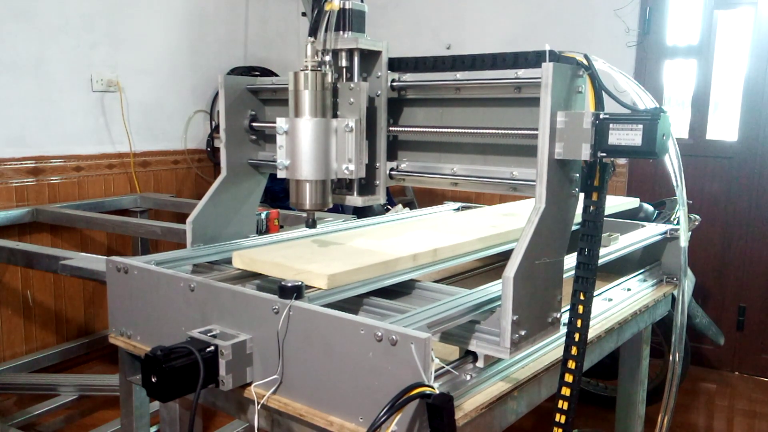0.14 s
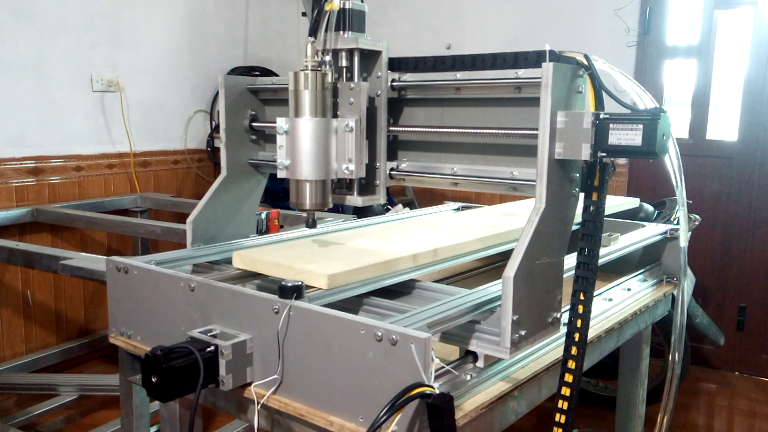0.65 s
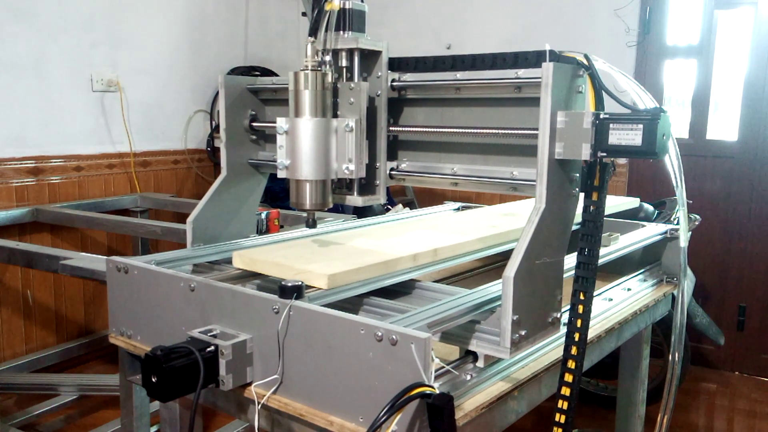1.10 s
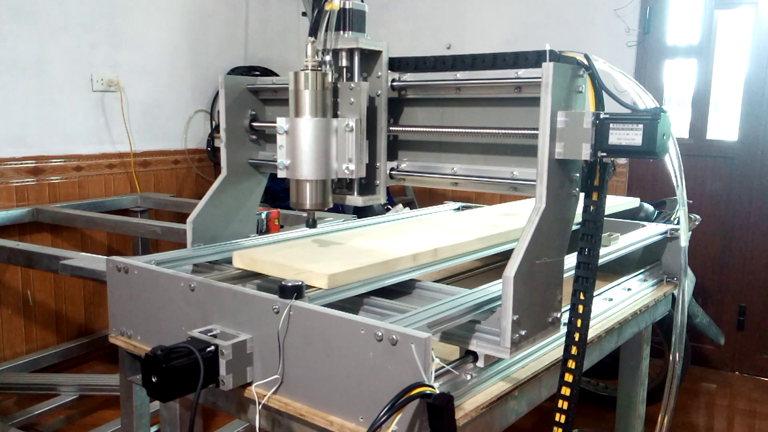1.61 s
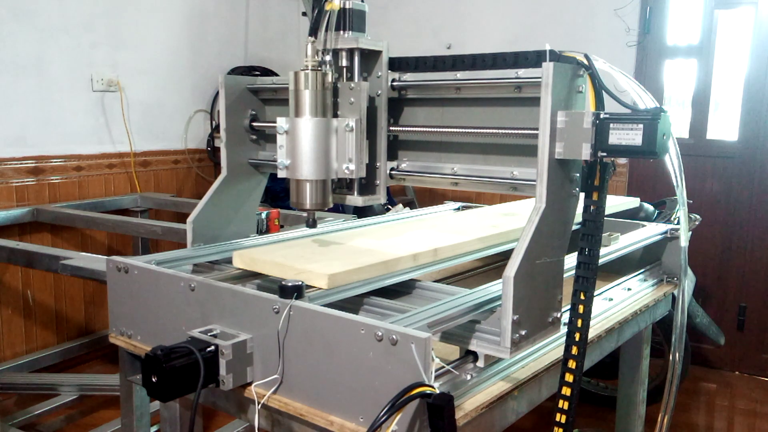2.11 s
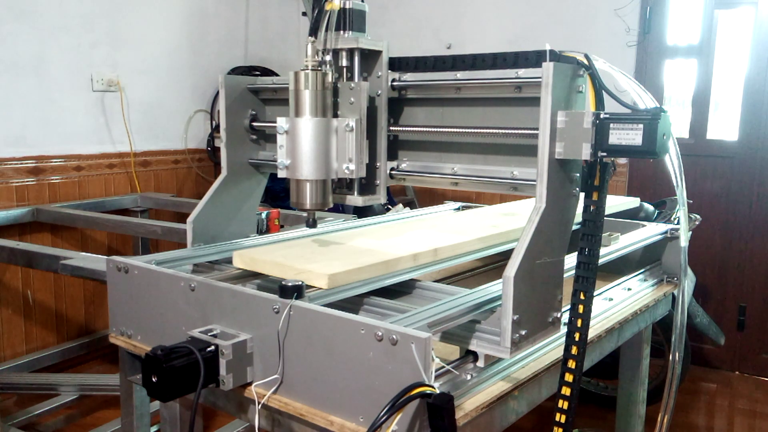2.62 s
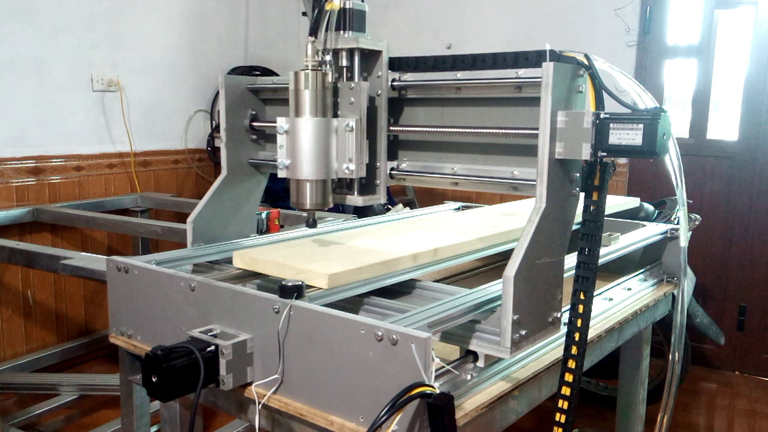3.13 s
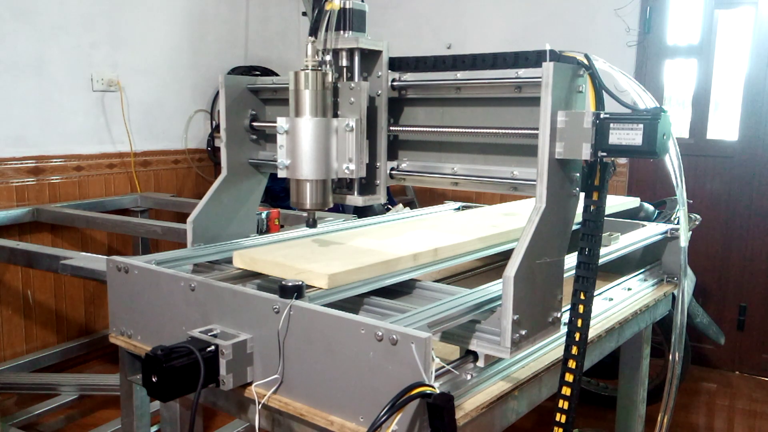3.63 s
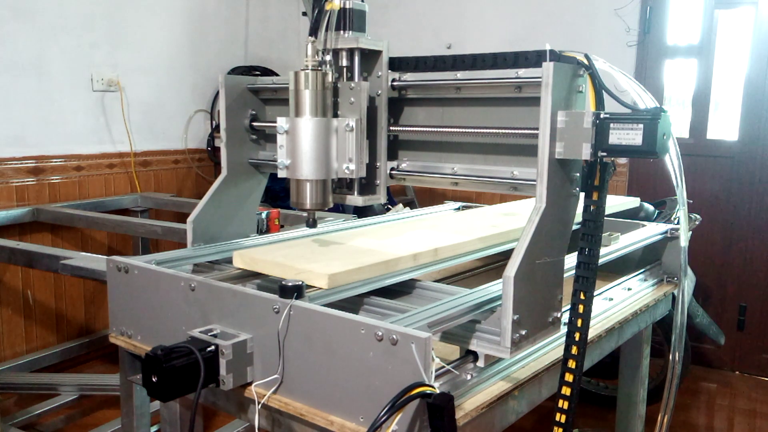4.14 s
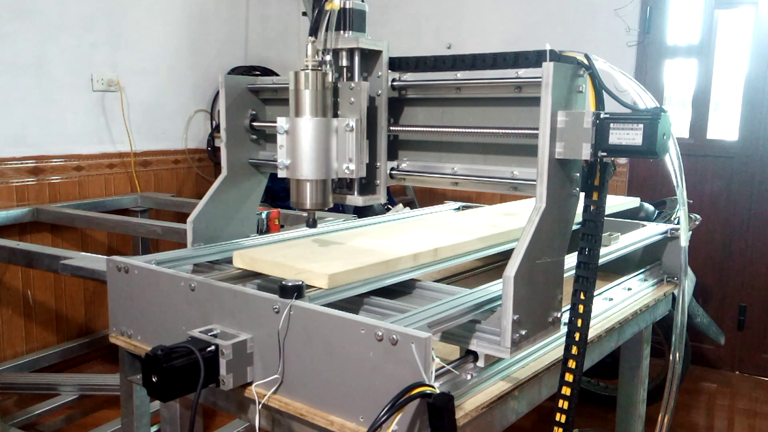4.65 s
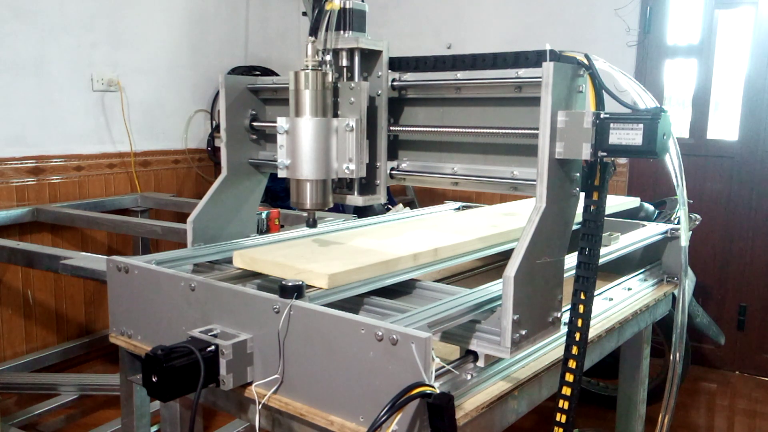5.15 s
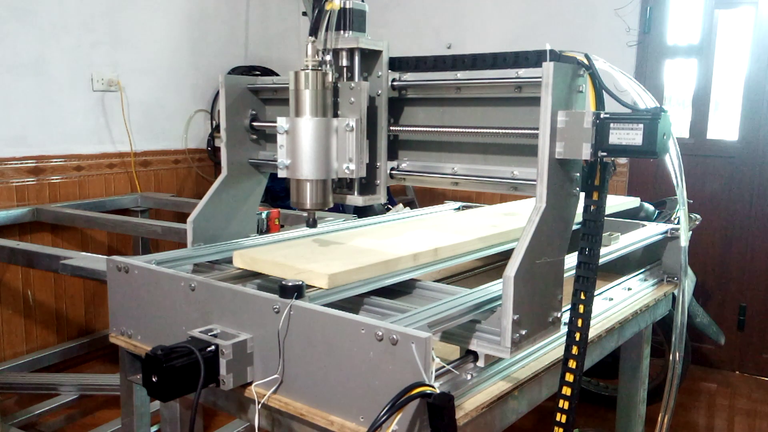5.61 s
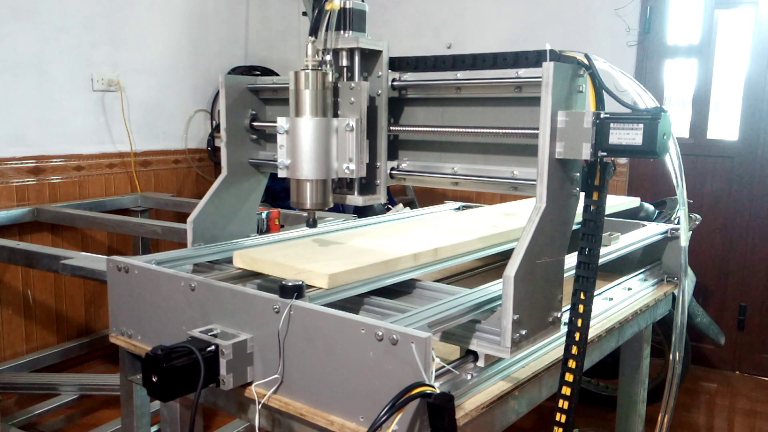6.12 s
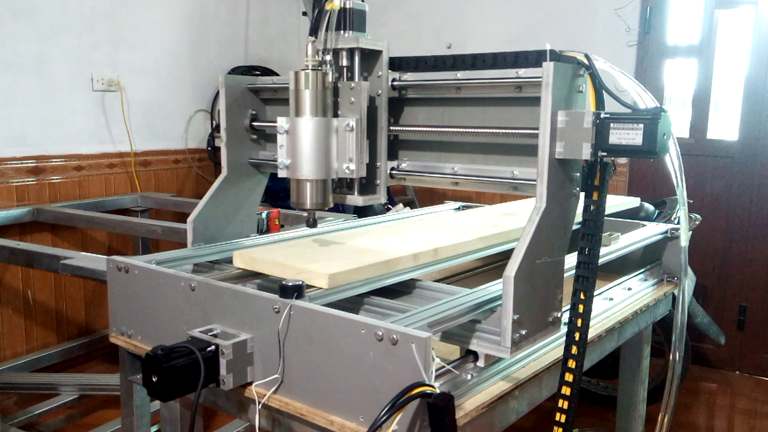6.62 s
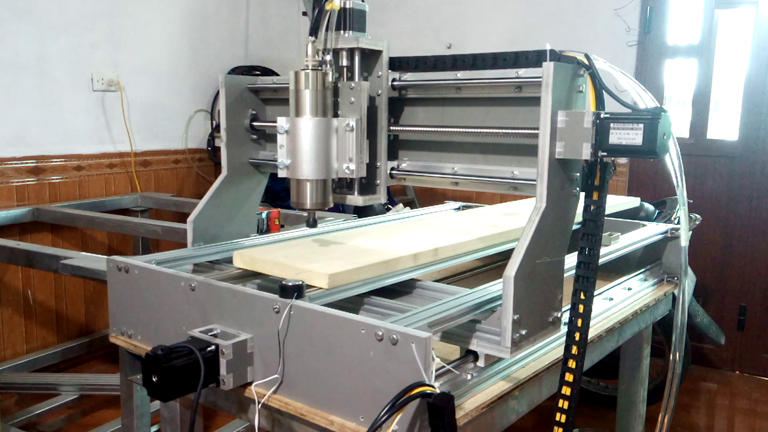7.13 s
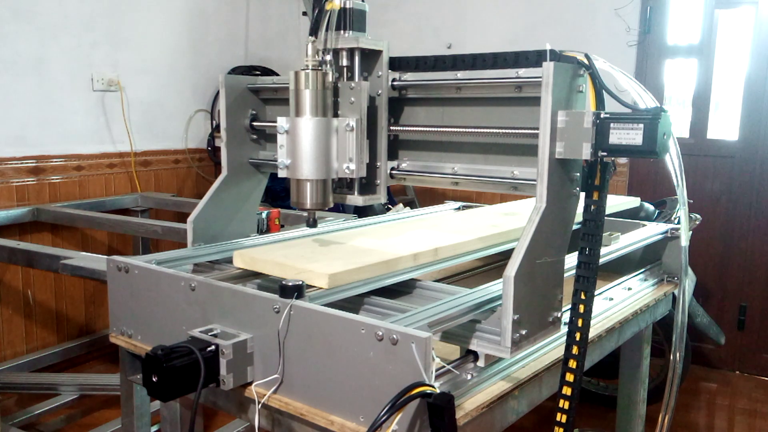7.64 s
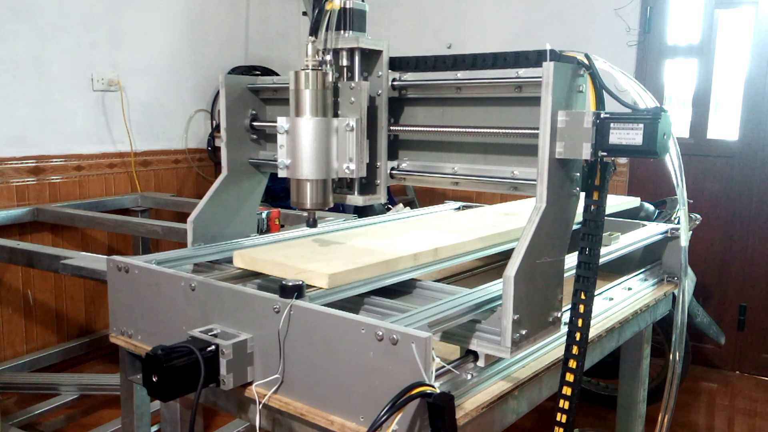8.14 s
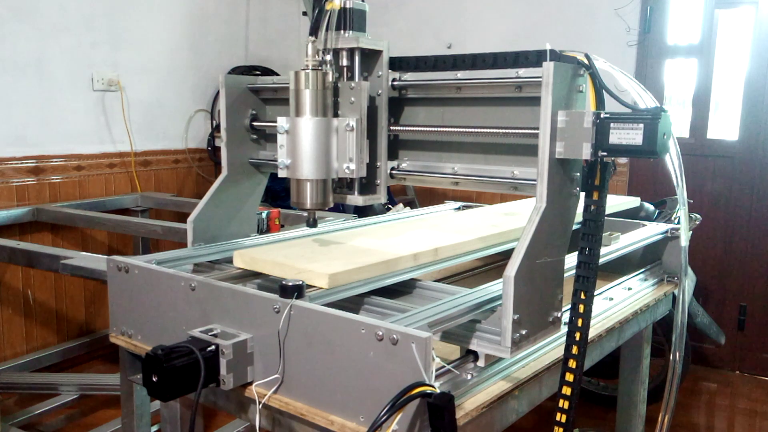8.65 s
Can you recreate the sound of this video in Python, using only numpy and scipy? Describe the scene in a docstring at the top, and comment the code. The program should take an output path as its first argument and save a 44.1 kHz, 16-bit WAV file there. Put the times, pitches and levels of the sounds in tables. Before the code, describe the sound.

Steady, shrill whine of a spindle motor in a tiled workshop, with quiet airy whir, an early sharp tick, and soft low thuds later on.

```python
"""A tiled workshop, where a water-cooled router spindle idles at a steady speed. Its inverter sings switching tones
with sidebands at multiples of the drive frequency; shaft, bearings, pump and electronics add held sines, and
filtered noise makes the rushing air. Soft low thumps are swelling, decaying rings; two ticks and faint treble
rustles are enveloped bands of noise. At the end a feed motor starts to hum, a sine sagging in pitch."""
import sys
import numpy as np
from scipy import signal
from scipy.fft import rfft, irfft, next_fast_len
from scipy.io import wavfile
from scipy.ndimage import uniform_filter1d, map_coordinates

SR = 44100
rng = np.random.default_rng(int(sys.argv[2]) if len(sys.argv) > 2 else 0)


def ratio_of_db(decibels):
    """Turn decibels (scalar or array-like) into linear amplitude factors; 0 dB maps to 1."""
    return 10 ** (np.asarray(decibels, float) / 20)


def dump(signal):
    """Clip the signal to [-1, 1] and save it as 16-bit WAV at the path in sys.argv[1]."""
    limited = np.clip(np.atleast_2d(signal).T, -1, 1)
    pcm = np.round(limited * 32767).astype(np.int16)
    wavfile.write(sys.argv[1], SR, pcm)


N = 386316
T = np.arange(N) / SR  # time in s

# Relative spectrum of the floor rumble: f/Hz, spectral level/dB
RUMBLE_SPECTRUM = [(22, -36.5), (38, -8.5), (65, -6.5), (91, 0), (118, -1.5), (188, -5), (227, -11),
                   (260, -8), (340, -34.5), (570, -120)]


def unit(x):
    """Normalisation: x scaled to an rms of 1."""
    return x / np.sqrt(np.mean(x ** 2) + 1e-20)


def curves(rows):
    """Linear interpolation: one value per sample for each column after the time."""
    s, *columns = np.transpose(rows)
    return [np.interp(T, s, column) for column in columns]


def wobble(rate):
    """Random modulation: Gaussian knots, rate of them a second, joined by straight lines."""
    knots = rng.standard_normal(int(N * rate / SR) + 4)
    return map_coordinates(knots, [T * rate], order=1)


def noise(gain):
    """Spectral shaping: white noise weighted by gain(Hz), brought to rms 1."""
    m = next_fast_len(N)
    spectrum = rfft(rng.standard_normal(m)) * gain(np.fft.rfftfreq(m, 1 / SR))
    return unit(irfft(spectrum, m)[:N])


def shape(points):
    """Frequency response: gain through (Hz, dB) points on a log axis, closed at both ends."""
    hz, db = np.transpose(points)
    return lambda f: ratio_of_db(np.interp(np.log(f + 1), np.log(hz + 1), db, -120, -120))


def tone(hz, db, drift=0, waver_db=1.5):
    """Sine by phase integration: drift offsets its pitch in Hz at each sample; its rms level db wavers."""
    phase = 2 * np.pi * (hz * T + np.cumsum(drift + 0 * T) / SR + rng.random())
    return np.sqrt(2) * ratio_of_db(db + waver_db * wobble(2.51)) * np.sin(phase)


def patchy(x, depth_db, bins, frames):
    """Time-frequency modulation: random lulls and weaker swells, shallowest in the mid range."""
    hz, _, z = signal.stft(x, SR, nperseg=512)
    grain = uniform_filter1d(rng.standard_normal(z.shape), bins, 0)
    field = unit(uniform_filter1d(grain, frames, 1))
    field = np.where(field > 0, .3 * field, field)  # lulls go deeper than swells rise
    depth = depth_db * np.interp(hz, [0, 1200, 2800], [.9, .5, 1.3])[:, None]
    return unit(signal.istft(z * ratio_of_db(depth * field), nperseg=512)[1][:N])


def inverter():
    """Switching modulation: sidebands at multiples of the drive frequency share one slight clock drift."""
    # Switching tones: centre f/Hz, sideband orders (multiples of the drive frequency). The fourth row is no
    # switching tone: it only places two faint high whistles near 11815 and 12479 Hz
    carriers = [(4641.3, (-4, -3, -2, 0, 2, 3, 4)), (7173.5, (-5, -4, -3, -2, -1, 0, 1, 2)),
                (10701.8, (-5, -3, -1, 5)), (12146.7, (-1, 1)), (13682.8, (-5, -3, -1, 0, 1, 2, 3, 4, 5))]
    # Mean rms level of each of those tones: one row per row above, level/dB in the order of its orders
    sideband_db = [(-86, -77, -68, -69, -76, -62, -89), (-93, -82, -90, -92, -68, -89, -77, -96),
                   (-93, -96, -102, -97), (-103, -86), (-92, -100, -89, -102, -81, -102, -82, -99, -80)]
    # Slow level course of three further sidebands: t/s, first order below the first centre level/dB,
    # first order above it level/dB, first order above the third centre level/dB
    whine = [(0, -33.5, -48.2, -75.5), (0.35, -32.5, -46, -75.2), (0.8, -32.5, -47.5, -76.5),
             (1.3, -31.8, -48.3, -76), (2.0, -31, -49, -74.8), (2.55, -31.6, -48.5, -74),
             (3.1, -31.0, -48, -74.3), (3.5, -31, -48.7, -75), (4.2, -30.8, -47.6, -74.5),
             (5.35, -31, -46.9, -73.8), (5.5, -31, -45, -73.8), (5.8, -32.1, -45.3, -73),
             (6.2, -31, -47.0, -73.3), (6.85, -32, -47.0, -72), (7.6, -32.5, -47.3, -72.5),
             (8.3, -31.5, -47.5, -73.5), (8.76, -32.3, -46.7, -73)]
    drive_hz = 332.02
    dip_s, dip_db, dip_width_s = 5.485, 3.6, .065  # width to 1/e of the depth, either side
    drift_hz = .25 * wobble(1.5)

    lower_db, upper_db, high_db = curves(whine)
    # the loudest sideband dips briefly
    lower_db = lower_db - dip_db * np.exp(-((T - dip_s) / dip_width_s) ** 2)
    lower_db = lower_db + .2 * wobble(5) + .2 * wobble(9) + .12 * wobble(20)
    upper_db = upper_db + .4 * wobble(4) + .3 * wobble(20)
    high_db = high_db + .5 * wobble(8)

    first_hz, third_hz = carriers[0][0], carriers[2][0]
    out = tone(first_hz - drive_hz, lower_db, drift_hz, waver_db=0)
    out += tone(first_hz + drive_hz, upper_db, drift_hz, waver_db=0)
    out += tone(third_hz + drive_hz, high_db, drift_hz, waver_db=0)
    for (centre_hz, orders), levels in zip(carriers, sideband_db):
        for order, db in zip(orders, levels):
            out += tone(centre_hz + order * drive_hz, db, drift_hz, waver_db=0.7)
    return out


def spindle():
    """Periodic excitation by turning parts: held tones, each wandering in pitch in proportion to its width."""
    # Shaft, bearing and pump tones: f/Hz, mean rms level/dB, pitch wander/Hz
    held_tones = [(200.5, -82, 0.2), (300.1, -69, 0.3), (331.7, -55, 0.2), (653.4, -68, 1.0),
                  (735.5, -58, 0.2), (860.7, -73, 0.2), (1199.1, -73, 0.3), (1293.3, -70, 0.2),
                  (1445.4, -71, 0.2), (1992.5, -72, 0.2), (2116.3, -75, 0.2), (2398.9, -76, 0.2),
                  (2501.2, -74, 0.2), (2625.0, -77, 1.0), (3023.4, -77, 0.3), (3756.9, -79, 0.2),
                  (3900.2, -79, 0.2), (4050.3, -76, 0.2), (4079.9, -76, 0.2), (4216.5, -71, 0.4),
                  (4401.5, -65, 0.3), (4468.8, -76, 0.2), (4586.6, -74, 0.7), (4736.0, -77, 0.2),
                  (4868.5, -80, 0.2), (5391.4, -75, 0.3), (5508.5, -82, 0.2), (5524.6, -81, 0.3),
                  (5657.8, -78, 0.2), (5845.6, -82, 0.2)]
    # Tones of slowly changing level: f/Hz, pitch wander/Hz
    swelling = [(1312, 5), (1578.5, .2), (1711.7, .3), (2099, 3), (3813.1, .3), (4602.4, .5)]
    # One slow level arc for each of these: level at the turning point/dB, its t/s, loss either side/(dB/s^2)
    arcs = [(-66.5, 3, .05), (-62.5, 1.5, .25), (-70.5, 3, -.2), (-58.5, 4, -0.05), (-65, 3, 0.4),
            (-61, 4.2, 0.7)]
    out = np.zeros(N)
    for hz, db, width in held_tones:
        out += tone(hz, db, width * wobble(3), waver_db=.6)
    for (hz, width), (turning_db, s, bend) in zip(swelling, arcs):
        arc_db = turning_db - bend * (T - s) ** 2
        out += tone(hz, arc_db + .8 * wobble(14), width * wobble(4), waver_db=.8)
    return out


def electronics():
    """Narrow-band oscillation: faint high whistles that waver in pitch and level."""
    # Whistles: f/Hz, mean rms level/dB
    whistles = [(6447.3, -79), (6580.6, -87), (6965.5, -77), (6971.9, -78), (7145.2, -92), (7236.5, -85),
                (7295.1, -89), (7759.4, -90), (9240.2, -100), (9282.5, -92), (9337.8, -98), (9596.0, -99),
                (9893.5, -99), (10493.8, -100), (10783.1, -96), (10795.3, -84), (10916.2, -88),
                (11685.7, -99), (11994.7, -89), (12596.0, -98), (12894.5, -91), (12927.5, -93),
                (13060.8, -96), (13194.1, -92), (13613.0, -100), (13940.7, -100), (14527.1, -97)]
    return sum(tone(hz, db, 0.84 * wobble(3.3), waver_db=2.0) for hz, db in whistles)


def air():
    """Turbulence exciting resonators: rush through the housing modes, hiss above it, rumble below it."""
    # Relative spectrum of the air and bearing rush: f/Hz, spectral level/dB
    rush_spectrum = [(200, -22.5), (280, -9.5), (350, -5.5), (470, -14.5), (600, -6.5), (720, -0.5),
                     (900, -3), (1300, -4.5), (1800, -6), (2300, -8), (3000, -12), (3600, -11),
                     (4300, -5.5), (5000, -9.5), (5700, -12), (6500, -19.5), (7300, -22.5), (8000, -44)]
    # Relative spectrum of the treble hiss: f/Hz, spectral level/dB
    hiss_spectrum = [(7600, -5), (8300, -8.5), (9300, -9), (10200, -11), (11000, -2.5), (11600, -7.5),
                     (12500, -1.5), (13200, -7), (13800, -6), (14500, -2), (15200, 1)]
    # Housing resonances: f/Hz, width/Hz, gain of each alone at its centre/dB
    housing = [(282, 9.2, 5), (653.5, 6, 4.5), (717, 30, 4), (780, 14, 1.5), (1196, 19, 2), (1310, 33, 6),
               (2074, 30, 5), (4330, 73, 7), (4950, 80, 2.5)]

    def resonance(f):
        """Modal superposition: a resonance curve for each mode, added to a flat response."""
        return 1 + sum((ratio_of_db(db) - 1) / (1 + (2 * (f - hz) / width) ** 2) for hz, width, db in housing)

    rush = noise(lambda f: shape(rush_spectrum)(f) * resonance(f))
    rush = ratio_of_db(-50) * patchy(rush, depth_db=5, bins=3, frames=8)
    hiss = noise(shape([*hiss_spectrum, (15750, -3)]))
    hiss = ratio_of_db(-78.5 + 0.67 * wobble(5)) * patchy(hiss, depth_db=3.5, bins=10, frames=12)
    rumble_db = -71 + 2.1 * wobble(4) + 3.4 * wobble(9.6)
    rumble = ratio_of_db(rumble_db) * noise(shape(RUMBLE_SPECTRUM))
    return rush + hiss + rumble


def thumps():
    """Damped oscillation of a pushed floor: a low ring swells, then dies, with overtones and shaken rumble."""
    # Thumps: start t/s, peak level of the fundamental/dB, f/Hz, rise time/s
    pushes = [(.04, -60, 104.4, .056), (1.88, -61, 92, 0.037), (3.742, -64, 46.2, .04),
              (5.90, -48.5, 135, .092), (6.06, -58, 128, .035), (6.3, -57, 90, .085), (6.3, -59, 174, .06),
              (6.66, -57, 111, .03), (7.2, -62, 97.4, 0.054), (7.7, -57, 109.4, .085),
              (7.93, -62, 149, .05)]
    base_t60_s, t60_per_rise, shake_db = 0.17, 2.7, -9  # slower pushes ring longer
    out = np.zeros(N)
    shake = ratio_of_db(shake_db) * noise(shape(RUMBLE_SPECTRUM))
    for s, db, hz, rise in pushes:
        t = np.clip(T - s, 0, None)
        t60 = base_t60_s + t60_per_rise * rise
        onset = np.sin(np.pi / 2 * np.clip(t / rise, 0, 1)) ** 2
        swell = onset * ratio_of_db(db - 60 * np.clip(t - rise, 0, None) / t60)
        phase = 2 * np.pi * hz * t + 0.32 * wobble(25)
        third = ratio_of_db(-9.5 + 1.6 * wobble(18)) * np.sin(3 * phase)
        fourth = ratio_of_db(-11.5 + 1.6 * wobble(18)) * np.sin(4 * phase)
        out += swell * (np.sin(phase) + third + fourth + shake)
    return out


def ticks():
    """Impact and reverberation: a sharp crack, its bounce and the tiled room's answer."""
    # Ticks: t/s, rms level of the noise before its envelope/dB, centre f/Hz, width/Hz
    cracks = [(.131, -36, 4750, 5000), (6.648, -64, 10300, 1310)]
    bounce_s, bounce_db, echo_db, echo_t60_s = 0.0037, -2, -13, 0.37

    def blow(t):
        """Impulse envelope: a rise within about 0.5 ms under a decay of 60 dB in 10 ms."""
        return (1 - np.exp(-(t / .0005) ** 2)) * ratio_of_db(-60 * t / .01)

    out = np.zeros(N)
    for s, db, hz, width in cracks:
        t = np.clip(T - s, 0, None)
        band = noise(lambda f: 1 / (1 + ((f - hz) / width * 2) ** 6))
        crack = blow(t) + ratio_of_db(bounce_db) * blow(np.clip(t - bounce_s, 0, None))
        # the echo builds up with the bounce delay as its time constant
        echo = (1 - np.exp(-t / bounce_s)) * ratio_of_db(echo_db - 60 * t / echo_t60_s)
        out += band * ratio_of_db(db) * (crack + echo)
    return out


def rustles():
    """Exponential decay of grainy treble bursts: sudden start, brief hold, echo; the upper band dies sooner."""
    # Pairs, a light rustle before a stronger one: t of the first/s, gap/s, relative level of the second/dB
    pairs = [(1.168, .113, -67.5), (2.616, .085, -65.5), (3.66, .108, -67.5), (6.838, .081, -69),
             (7.005, .094, -69.5)]
    # First and second of a pair: level against that of the second/dB, hold/s, lower-band t60/s
    pair_steps = [(-5, .02, .2), (0, .04, .37)]
    # Lower and upper band, one row of points each: f/Hz, relative spectral level/dB
    bands = [
        [(11200, -26), (11700, -7.5), (12600, 0.5), (13400, -7), (14000, -24)],
        [(13400, -25.5), (14300, -4.5), (15000, -2.5), (15750, -3)],
    ]
    out = np.zeros(N)
    for band, band_db, t60_factor in zip(bands, (0, -.6), (1, .7)):
        power = np.zeros(N)
        for s, gap, db in pairs:
            for at, (step_db, hold, t60) in zip((s, s + gap), pair_steps):
                fall_db = 60 * np.clip(T - at - hold, 0, None) / (t60 * t60_factor)
                power += (T > at) * ratio_of_db(db + step_db - fall_db) ** 2
        grain = ratio_of_db(band_db - 2.0 + 3.8 * wobble(150))
        out += np.sqrt(power) * grain * noise(shape(band))
    return out


def feed_motor():
    """Frequency glide: a stepping tone fades in, then its level falls while its pitch sags."""
    start_s, rise_s, level_db, fall_db_per_s = 8.61, .085, -44.5, 28  # rms level before fade and fall
    pitch_hz, sag_hz_per_s = 842, 90
    t = np.clip(T - start_s, 0, None)
    fade = np.sin(np.pi / 2 * np.clip(t / rise_s, 0, 1)) ** 2
    cycles = pitch_hz * t - sag_hz_per_s * t ** 2 / 2
    return np.sqrt(2) * fade * ratio_of_db(level_db - fall_db_per_s * t) * np.sin(2 * np.pi * cycles)


def scene():
    """Linear superposition: the pressures of all sources add at one microphone."""
    steady = inverter() + spindle() + electronics() + air()
    passing = thumps() + ticks() + rustles() + feed_motor()
    return (steady + passing)[None]


def top_cut(x):
    """Nothing passes above the cut-off."""
    return signal.sosfilt(signal.butter(12, 15740, fs=SR, output="sos"), x)


def record(dry):
    """Single-channel pickup: the microphone signal is the finished mix."""
    return top_cut(dry)


dry = scene()
out = record(dry)
dump(out)
```